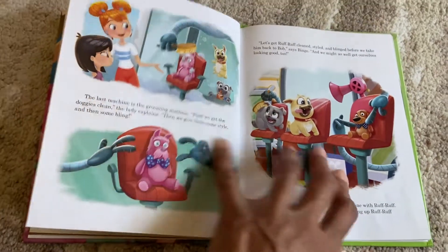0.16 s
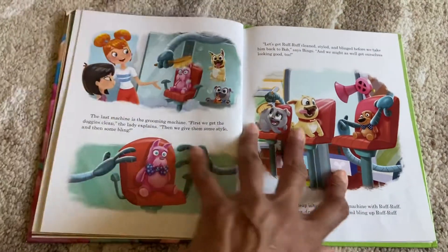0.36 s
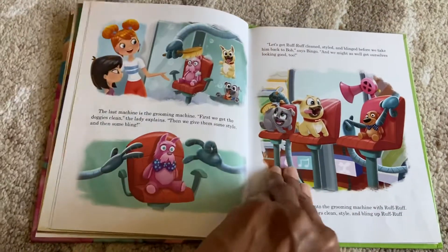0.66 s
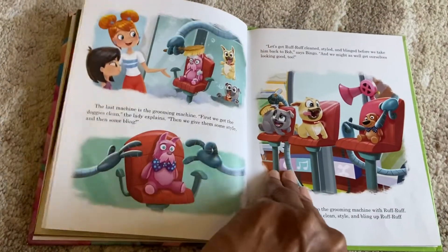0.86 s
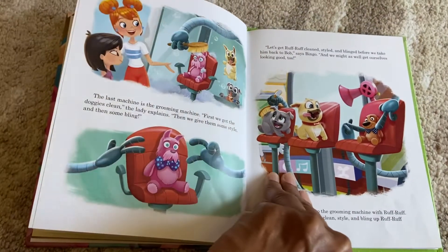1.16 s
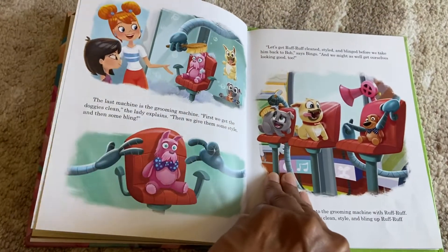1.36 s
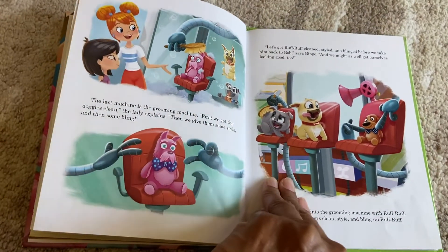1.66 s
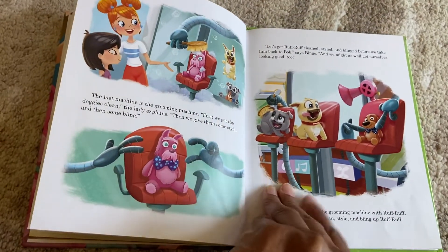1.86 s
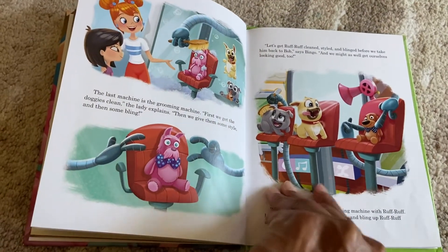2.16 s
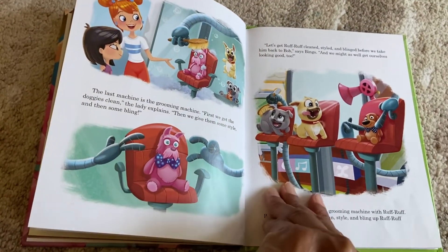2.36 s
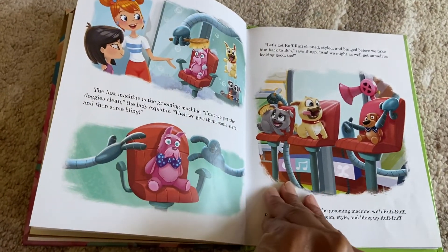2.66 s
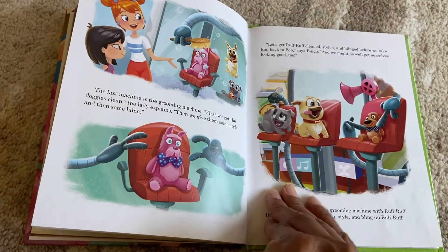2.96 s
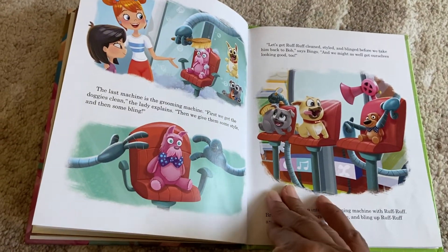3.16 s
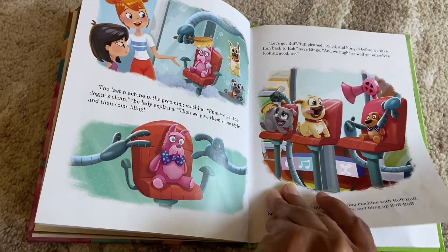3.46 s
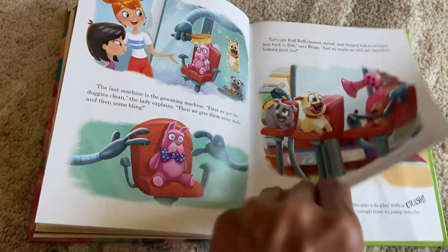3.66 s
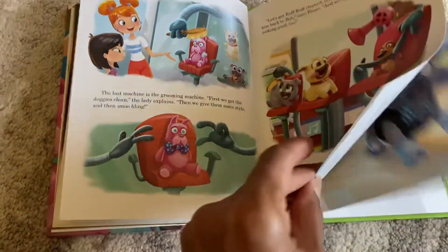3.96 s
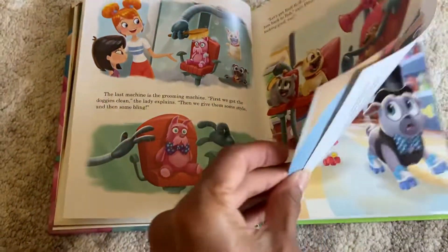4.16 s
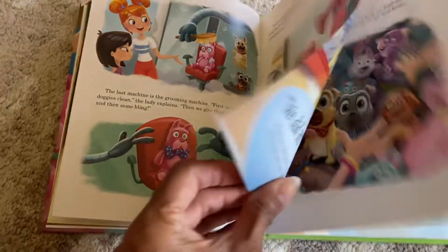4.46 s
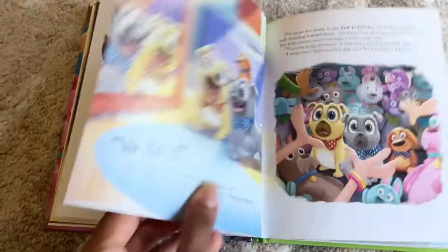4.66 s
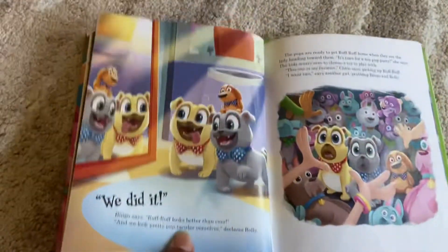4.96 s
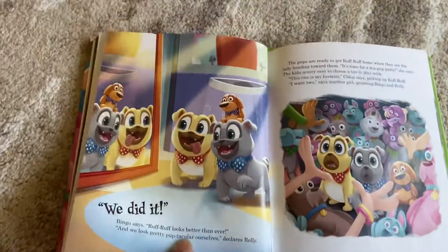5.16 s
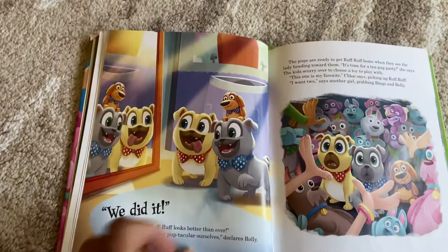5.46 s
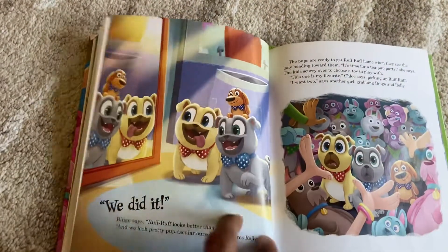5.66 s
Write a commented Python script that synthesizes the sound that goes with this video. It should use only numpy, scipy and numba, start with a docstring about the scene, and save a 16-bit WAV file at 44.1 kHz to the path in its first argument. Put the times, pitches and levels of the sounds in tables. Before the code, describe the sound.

Close book handling on carpet: light crinkly taps, a scraping page turn ending in a loud snap, then soft dull scuffs over a low rumble.

```python
"""Papery snaps, scrapes, rustles and dull scuffs, with a low rumble and a faint, dull low murmur beneath them.
A hand presses and turns the glossy pages of a hardcover book on a carpet, close under a hand-held phone.
Snaps and rubs kick the ringing notes of a sheet; slides send gritty noise through drifting resonances.
Scuffs and page flexing are coloured grit, grip rumble and background murmur are coloured noise;
a small soft room adds a short tail."""
import sys
import numpy as np
from scipy import signal
from scipy.fft import rfft, irfft, next_fast_len
from scipy.io import wavfile
from scipy.ndimage import uniform_filter1d
from numba import njit

SR = 44100
rng = np.random.default_rng(int(sys.argv[2]) if len(sys.argv) > 2 else 0)


def store_pcm(level_fs):
    """Save levels as 16-bit WAV."""
    pcm = np.round(np.clip(level_fs, -1, 1) * 32767).astype(np.int16)
    wavfile.write(sys.argv[1], SR, np.atleast_2d(pcm).T)


N = 255709  # length in samples
SIZE = next_fast_len(N + SR)  # room for the filters to ring past the end
HZ = np.arange(SIZE // 2 + 1) * SR / SIZE

# Hand movement, levels before the settling is added:
# (time [s], slide level [dB], treble sheen level [dB], page-block flexing level [dB])
HAND = [(0.0, -55.5, -64.5, -64), (0.15, -61.5, -53, -63), (0.28, -61.5, -63, -57.5),
        (0.45, -63, -58.5, -74), (0.6, -66, -67.5, -65.5), (0.72, -75, -85.5, -58.5),
        (1.26, -80.5, -85.5, -67.5), (1.66, -80, -82.5, -61), (1.92, -69.5, -81, -61.5),
        (2.02, -70, -86, -59), (2.31, -82.5, -87.5, -74.5), (2.79, -82, -81.5, -70), (3.2, -71, -83, -81),
        (3.47, -66, -66.5, -61.5), (3.71, -58, -63, -81), (3.92, -46.5, -45.5, -88),
        (4.15, -49, -53, -60.5), (4.38, -57, -92, -47), (4.6, -61, -57, -65), (4.78, -59.5, -66, -56),
        (5.0, -66, -79, -48.5), (5.1, -59.5, -60, -70), (5.2, -64, -54.5, -48.5), (5.39, -77.5, -80, -66),
        (5.62, -69, -58, -94), (5.8, -67, -67.5, -66)]
# Creases and taps; the offsets balance the notes before the whole snap is set to its peak:
# (time [s], peak [dB], body offset [dB], treble offset [dB])
SNAPS = [(0.072, -36, -7, -27), (0.11, -37, -14, -12), (0.145, -47, 11, -18), (0.155, -42.5, -11, -30),
         (0.164, -42, -7, -32), (0.187, -39.5, -18, -30), (0.202, -46, -25, -29), (0.21, -42, -15, -30),
         (0.219, -40, -17, -26), (0.234, -35, -12, -11), (0.348, -42.5, -1, -35), (0.464, -45, -8, -28),
         (0.53, -49, -24, 17), (0.653, -51, -3, -35), (0.668, -41, -5, -19), (0.717, -43, -17.5, -20),
         (0.863, -52, -9, -16), (0.886, -44, -9, -27), (0.936, -45.5, 0, -16), (0.945, -45, 0, -15),
         (0.972, -42.5, -3.5, -19), (1.002, -40.5, -11, -34), (1.138, -51, -13, -18),
         (1.167, -51.5, -3, -13), (1.226, -48, -3.5, -22), (1.326, -52, -17, -18), (1.368, -53.5, -15, -18),
         (1.384, -30.5, -2, -20.5), (1.412, -36, -6, -19.5), (1.451, -38, -10, -25),
         (1.487, -38, -11, -22.5), (1.62, -59, -20, -33), (1.647, -42.5, -17, -19), (1.654, -42.5, -6, -18),
         (1.741, -40.5, -1, -25), (1.784, -41.5, -11, -23), (1.826, -46, -16, -25), (2.018, -46, -2, 17),
         (2.078, -48, -6, -20), (2.173, -38, 10, -37), (2.438, -53.5, -3, -16), (2.511, -52, -15, -24),
         (2.604, -46.5, -3.5, -40), (2.843, -39, -10, -31), (2.87, -49, -7, -44), (2.972, -42, -8, -18),
         (2.984, -42, -14, -24), (2.997, -42.5, -5, -18), (3.046, -38, -4, -16), (3.055, -38, -19, -13),
         (3.08, -38, -9, -22), (3.126, -48, -2, -23), (3.232, -48, 1, 6), (3.243, -42, -21, 18),
         (3.298, -40, -21, 4), (3.427, -37.5, -4, 0.5), (3.434, -30.5, -15.5, -21),
         (3.759, -29, -18.5, -16.5), (3.776, -56, -22, -13), (3.796, -36, -27, -5), (3.822, -32.5, -36, 1),
         (3.829, -36, -38, -2), (3.878, -35, -26, -25), (3.923, -29.5, -48, 20),
         (4.4705, -18, -15.5, -20.5), (4.624, -42.5, -25, -5), (4.797, -39.5, -10, -30),
         (4.826, -31.5, -10.5, -29), (5.085, -50, -13, -27), (5.193, -35, -17, 15), (5.591, -37, -42, -37)]
# Drags of skin or page edge and hard cracks, each with its own colour; offsets as for the snaps:
# (time [s], peak [dB], body offset [dB], treble offset [dB], middle offset [dB],
#  centre of the middle [Hz], build-up [ms])
RUBS = [(0.422, -29, -28, -17, -9, 2020, 0.18), (1.771, -37, -1, -25, -25, 2400, 2.7),
        (1.867, -46.5, -10, -25, -12, 2300, 9.5), (1.952, -54, -23, -36, -8, 3830, 20),
        (2.029, -50.5, -19, -16, -10, 2300, 12), (2.15, -28, -5, -15, -3, 2100, 0.69),
        (2.776, -50.5, -7, -25, -14, 1800, 18), (2.827, -41, -3, -45, -25, 2300, 4.1),
        (3.2603, -20, -13, 0, 6.5, 2550, 0.27), (3.2603, -18.5, -34, -4.5, 11.5, 4700, 0.18),
        (3.447, -44.5, -37, -3, 10, 3200, 4.7), (3.63, -49, -37, -10, 5, 3270, 22),
        (3.72, -37, -34, -11, 5, 2370, 6.5), (3.837, -30.5, -50, -11, 23, 3540, 9.7),
        (3.894, -23, -51, -3.5, 2, 3060, 2.4), (3.947, -31.5, -40, 8, 12.5, 3500, 7.9),
        (4.278, -39, -7.5, -8.5, -14, 2400, 7.2), (4.319, -33, -12, -9, -5, 2380, 2.5),
        (4.352, -30, -11, -18, -10, 2630, 11.2), (4.386, -23.5, -27, -18, -2.5, 2160, 2.7),
        (4.414, -34.5, -11, -6, -6, 3030, 6.8), (4.45, -29, -8.5, -53, -35, 1900, 4.4),
        (4.461, -25.5, -21.5, -41, -23, 1680, 4.4), (4.582, -35.5, -23, -11.5, -9, 3000, 6.3),
        (5.02, -49, -26, -31, 16, 3200, 1.1), (5.226, -26, -8, 1, -10.5, 2380, 2)]
# Ringing notes (modes) of the sheet, before detuning and level scatter:
# (frequency [Hz], time to fade by 60 dB [ms], level before the offsets [dB])
SHEET = [(279.7, 41, 6), (410.6, 28, 15.5), (580, 22, 9.5), (716, 13.7, -2), (918, 14, -1.5),
         (1164, 8.9, 8), (1760, 24, 2.5), (2364, 4.6, 10), (3493, 2.4, 12), (4750, 6.6, 12),
         (6340, 1.8, 7.5), (7940, 4.8, 7), (10210, 1.8, 10), (12300, 4.5, 2.5), (15300, 8.3, -7)]
SNAP_MS = 0.36  # build-up of a snap or tick


def undb(db):
    """Turn decibels into a plain gain."""
    return 10 ** (np.asarray(db) / 20)


def curve(time_s, db):
    """Join the points of a level curve and give the gain at every sample."""
    return undb(np.interp(np.arange(N) / SR, time_s, db))


def table(rows):
    """Read a (frequency [Hz], value) table at every frequency, on a log axis."""
    hz, value = np.transpose(rows)
    return np.interp(np.log(HZ + 1), np.log(hz), value)


def colour(x, rows):
    """Filter a sound by a table of levels over frequency, then set its rms to 1."""
    y = irfft(rfft(x, SIZE) * undb(table(rows)), SIZE)[..., :N]
    return y / np.sqrt(np.mean(y ** 2))


def walk(rate):
    """Wander between random values drawn `rate` times a second, with a spread near 1."""
    hold = int(SR / rate)
    steps = np.repeat(rng.standard_normal(N // hold + 1), hold)
    return 1.2 * uniform_filter1d(steps, hold)[:N]


def grit(rate, spread_db, smooth, flicker_db):
    """Stick-slip friction: tiny uneven clicks over smooth noise, flickering together."""
    fires = rng.random(N) < rate / SR  # about `rate` clicks a second
    strength = undb(spread_db * np.minimum(rng.exponential(1, N), 3))
    clicks = fires * strength * rng.standard_normal(N)
    clicks /= np.sqrt(np.mean(clicks ** 2))
    friction = clicks + smooth * rng.standard_normal(N)
    return friction * undb(flicker_db * np.tanh(walk(40)))


def spread(make):
    """Make two channels from one shared and one differing draw of a sound."""
    # how much differs between the channels: (frequency [Hz], differing part relative to the shared part)
    width_table = [(40, 0.23), (200, 0.24), (600, 0.67), (2000, 0.61), (5000, 1), (8000, 0.024),
                   (16000, 0.044)]
    wide = np.clip(table(width_table), 0, 1)
    mid = rfft(make(), SIZE)
    side = rfft(make(), SIZE) * wide
    channels = np.array([mid + side, mid - side]) / np.sqrt(1 + wide ** 2)
    return irfft(channels, SIZE)[:, :N]


@njit
def svf(x, hz, sharp, sr):
    """Band-pass resonance whose centre can move at every sample."""
    y, band, low, damping = np.empty(len(x)), 0., 0., 1 / sharp
    for i in range(len(x)):
        g = np.tan(np.pi * hz[i] / sr)
        v = (band + g * (x[i] - low)) / (1 + g * (g + damping))
        band, low, y[i] = 2 * v - band, low + 2 * g * v, damping * v
    return y


def rustle(rub, modes, rows, swell_db):
    """Friction through the sheet's resonances, each drifting and swelling alone as the page bends."""
    drift_octaves, sharpness = 0.15, 4.
    total = np.zeros(N)
    for hz, _, _ in modes:
        centre_hz = np.minimum(hz * 2 ** (drift_octaves * walk(13)), SR / 2.5)
        band = svf(rub, centre_hz, sharpness, 1. * SR)
        total += band / band.std() * undb(swell_db * np.tanh(walk(15)))
    return colour(total, rows)


def sheet(events, middle, build_ms):
    """Each slip kicks the sheet's modes; bending waves carry the treble first, the bass later."""
    detune, mode_scatter_db = 0.045, 1.8  # random spread of pitch (as a share) and level
    middle_db_per_octave = 17  # middle modes weaken away from their centre
    out, t = np.zeros((2, N + 8192)), np.arange(2048) / SR
    hz, t60_ms, db = np.transpose(SHEET)[:, :, None]
    draws = rng.standard_normal((len(events), 2, len(SHEET), 1))
    kicks = rng.standard_normal((len(events), 2, 1, 2048))
    for event, (middle_db, middle_hz), ms, draw, kick in zip(events, middle, build_ms, draws, kicks):
        time_s, peak_db, body_db, treble_db = event
        age = np.maximum(t - 0.0914 / np.sqrt(hz), 0)  # lower notes arrive later
        ring = np.sin(2 * np.pi * hz * (1 + detune * draw[1]) * age) * undb(-60000 * age / t60_ms)
        # the slip builds up, lets go and dies away
        turn = 1000 * t / ms
        stereo_kick = kick[0] + 0.34 * kick[1] * np.array([[[1]], [[-1]]])
        slip = stereo_kick * turn * np.exp(-turn)
        modes = signal.fftconvolve(slip, ring[None], axes=2)
        off_db = middle_db_per_octave * np.abs(np.log2(hz / middle_hz))
        # body below 600 Hz, no offset to 1500 Hz, middle to 5500 Hz, then treble
        share_db = np.select([hz < 600, hz < 1500, hz < 5500], [body_db, 0, middle_db - off_db], treble_db)
        mode_gain = undb(db + share_db + mode_scatter_db * draw[0])
        modes *= mode_gain / np.abs(modes).max((0, 2))[:, None]
        one = modes.sum(1)
        one *= undb(peak_db) / np.abs(one).max()
        start = int(time_s * SR)
        out[:, start:start + one.shape[1]] += one
    return out[:, :N]


def crack(events):
    """Give each snap its middle offset, which follows the treble part of the way, and its centre."""
    return [(4 + 0.95 * treble_db, 2500) for _, _, _, treble_db in events]  # dB, Hz


def settling():
    """Gains that jump at each snap or rub and fade: whole sound, treble, body."""
    fade_t60_ms, colour_share = 105, 0.58
    jumps = np.zeros((3, N))
    for time_s, peak_db, body_db, treble_db, *_ in SNAPS + RUBS:
        offsets_db = colour_share * np.array([0, min(treble_db, 0), body_db])
        jumps[:, int(time_s * SR)] = undb(peak_db + offsets_db)
    return signal.lfilter([1], [1, -undb(-60000 / fade_t60_ms / SR)], jumps)


def quiet():
    """Steady, dull low background murmur, made by filtering white noise."""
    # colour of the murmur: (frequency [Hz], relative level [dB])
    quiet_colour = [(90, -4), (150, 13), (400, -4), (900, -15), (2400, -19), (6000, -70), (16000, -66)]
    return undb(-70.5) * spread(lambda: colour(rng.standard_normal(N), quiet_colour))


def room(x):
    """A short fading tail of dense random echoes, different left and right."""
    t60_s, tail_db, treble_cut_hz = 0.3, -13, 4630
    t = np.arange(SR // 2) / SR
    tail = rng.standard_normal((2, len(t))) * undb(-60 * t / t60_s) * (t > .002)
    # carpet swallows the treble
    tail = signal.sosfilt(signal.butter(1, treble_cut_hz, fs=SR, output="sos"), tail)
    tail *= undb(tail_db) / np.sqrt(np.sum(tail ** 2, 1, keepdims=True))
    return signal.fftconvolve(x, tail, axes=1)[:, :N]


def grip():
    """Low rumble of the holding hand: deep noise with a wandering level and a few thumps."""
    # slow level before the wandering: (time [s], level [dB])
    grip_level = [(0.0, -55), (0.4, -54.5), (0.9, -58.5), (1.3, -53), (1.65, -50), (1.93, -56), (2.3, -52),
                  (2.45, -54.5), (2.8, -68), (3.24, -61), (3.7, -61.5), (4.15, -52.5), (4.5, -49.5),
                  (4.62, -60.5), (5.1, -54), (5.25, -48), (5.8, -49)]
    # colour of the rumble: (frequency [Hz], relative level [dB])
    grip_colour = [(22, -48), (38, 7.5), (50, 17), (75, 10.5), (105, 7.5), (160, -55.5)]
    # thumps added to the rumble's gain: (time [s], added gain at the top [dB], time from top to 1/e [ms])
    thumps = [(1.48, -50, 12), (2.021, -46, 29), (2.24, -49.5, 72), (3.33, -47, 60), (3.825, -45.5, 20),
              (3.98, -41, 21), (4.055, -38, 15), (4.82, -50, 57)]
    ms = 1000 * np.arange(N) / SR
    bumps = np.zeros(N)
    for time_s, db, length_ms in thumps:
        bumps += undb(db) * np.exp(-((ms - 1000 * time_s) / length_ms) ** 2)
    wander_db = 3 * walk(9)
    gain = curve(*np.transpose(grip_level)) * undb(wander_db) + bumps
    return gain * spread(lambda: colour(rng.standard_normal(N), grip_colour))


def flex(settle):
    """The page block flexes: sparse, uneven low clicks that also swell after snaps and rubs."""
    # colour of the flexing: (frequency [Hz], relative level [dB])
    flex_colour = [(90, -7.5), (160, 3), (280, 3.5), (450, -2), (620, -13), (1200, -46)]
    time_s, _, _, flex_db = np.transpose(HAND)
    gain = curve(time_s, flex_db) + undb(-13.5) * settle
    return gain * spread(lambda: colour(grit(150, 4.1, 1.0, 4.1), flex_colour))


def scuffs():
    """Carpet pile drags under the cover: sudden start, long fade that loses its treble first."""
    # dull scuffs: (time [s], approximate peak [dB], time for the low part to fade by 60 dB [s])
    scuff_events = [(4.816, -36, 0.47), (4.897, -38.5, 0.46), (5.164, -32.5, 0.51), (5.421, -27.5, 0.64),
                    (5.66, -28.5, 0.71)]
    # colour of the scuffs: (frequency [Hz], relative level [dB])
    scuff_colour = [(59, -22), (100, -9), (305, -4.5), (370, -14), (411, -9), (681, -9), (745, -16),
                    (839, -7.5), (1700, -22.5), (3500, -45), (4550, -46), (7700, -120)]
    crest_db = 6.5  # peak over rms
    t, low, high = np.arange(N) / SR, 0, 0
    for time_s, peak_db, t60_s in scuff_events:
        age = np.maximum(t - time_s, 0)
        rise = undb(peak_db - crest_db) * (1 - np.exp(-age / 0.0072))
        low = low + rise * undb(-60 * age / t60_s)
        high = high + rise * undb(-95 * age / t60_s)
    drag = spread(lambda: colour(grit(2800, 1.9, 2.0, 1.0), scuff_colour))
    dull = signal.sosfilt(signal.butter(2, 550, fs=SR, output="sos"), drag)
    return low * dull + high * (drag - dull)


def sheen(settle):
    """Bright hiss of the slide: dense friction clicks through the sheet's upper modes."""
    # colour of the sheen: (frequency [Hz], relative level [dB])
    sheen_colour = [(3000, 4), (5000, 2), (6300, 3.5), (9000, -4.5), (12000, 0.5), (15500, -0.5),
                    (17000, -69)]
    time_s, _, sheen_db, _ = np.transpose(HAND)
    gain = curve(time_s, sheen_db) + undb(-27) * settle
    return gain * spread(lambda: rustle(grit(2000, 2.2, 2.5, 3.5), SHEET[8:], sheen_colour, 1.37))


def slide(settle):
    """Fingers and pages slide: friction clicks through the sheet's middle modes."""
    # colour of the slide: (frequency [Hz], relative level [dB])
    slide_colour = [(300, 0), (700, -1), (1200, 6), (2400, 4.5), (3500, 3.5), (5500, -2.5), (8000, -59)]
    time_s, slide_db, _, _ = np.transpose(HAND)
    gain = curve(time_s, slide_db) + undb(-27) * settle
    return gain * spread(lambda: rustle(grit(700, 3.35, 0.75, 2.6), SHEET[3:11], slide_colour, 4.5))


def ticks():
    """Faint chance creases kick the sheet, stronger while the hand slides."""
    count, over_slide_db, scatter_db = 70, 6, 5.5
    body_db, treble_db = -5, -6  # offsets, as for the snaps
    draw = rng.random((count, 2))
    time_s = (np.arange(count) + draw[:, 0]) * N / SR / count  # one in each equal slot of time
    slide_db = np.interp(time_s, *np.transpose(HAND)[:2])
    peak_db = slide_db + over_slide_db + scatter_db * np.log(draw[:, 1] + 0.0069)
    rows = [(at, db, body_db, treble_db) for at, db in zip(time_s, peak_db)]
    return sheet(rows, crack(rows), np.full(count, SNAP_MS))


def rubs():
    """Drags and hard cracks kick the sheet with their own build-up; a longer one drags on longer."""
    rows = np.array(RUBS)
    return sheet(rows[:, :4], rows[:, 4:6], rows[:, 6])


def snaps():
    """Creases let go at once and kick the sheet into a brief ring."""
    return sheet(SNAPS, crack(SNAPS), np.full(len(SNAPS), SNAP_MS))


def scene():
    """Add the book's sounds, their room tail, the grip and the background murmur."""
    whole, treble, body = settling()
    book = snaps() + rubs() + ticks() + scuffs()
    friction = slide(whole) + sheen(treble) + flex(body)
    return book + room(book) + friction + grip() + quiet()


def record(dry):
    """The phone turns the treble phase of the channels against each other and cuts the top."""
    # stereo steering: (frequency [Hz], phase by which left leads right [radians])
    steering = [(0, 0), (6900, 0), (8900, -3.14), (13200, -9.42), (17000, -14)]
    hz, lead = np.transpose(steering)
    turn = np.exp(.5j * np.interp(HZ, hz, lead) * np.array([[1], [-1]]))
    wet = irfft(rfft(dry, SIZE) * turn, SIZE)[:, :N]
    top_hz = 16600
    return signal.sosfilt(signal.ellip(10, .2, 70, top_hz, fs=SR, output="sos"), wet)


dry = scene()
out = record(dry)
store_pcm(out)
```